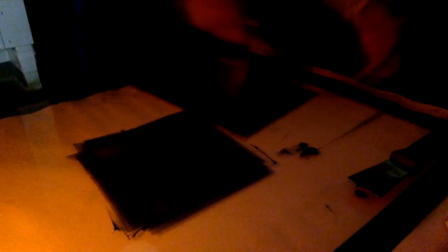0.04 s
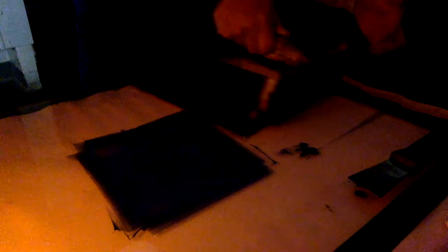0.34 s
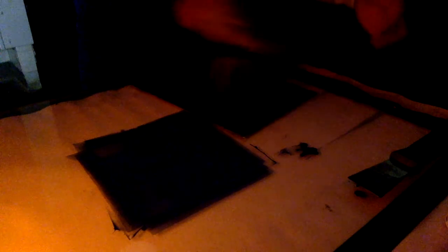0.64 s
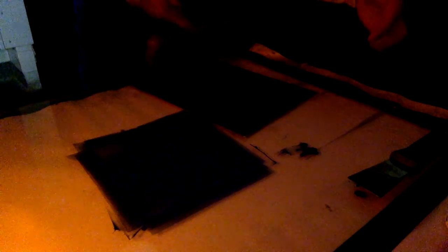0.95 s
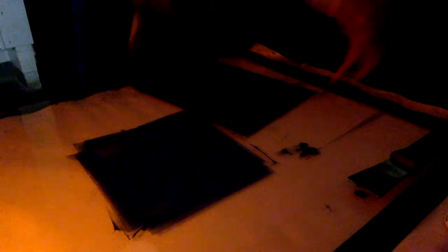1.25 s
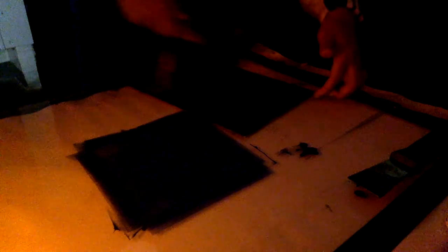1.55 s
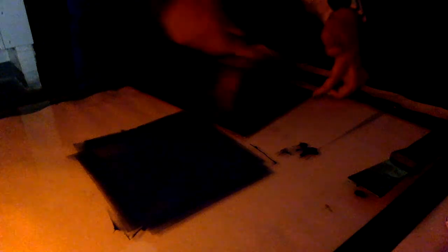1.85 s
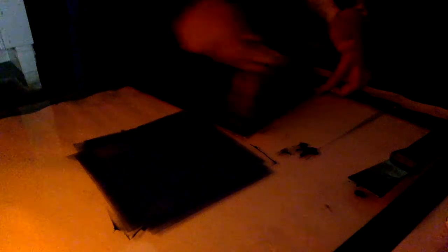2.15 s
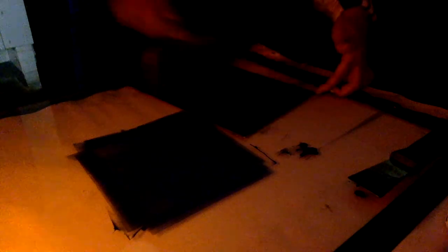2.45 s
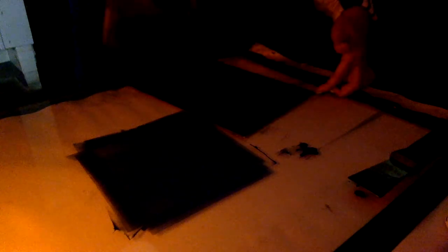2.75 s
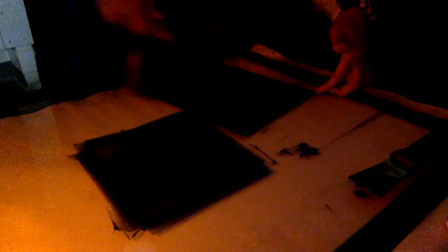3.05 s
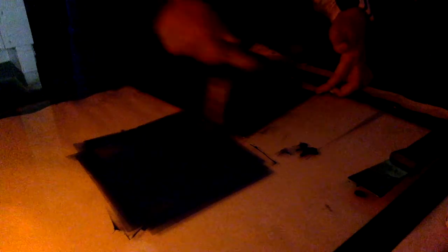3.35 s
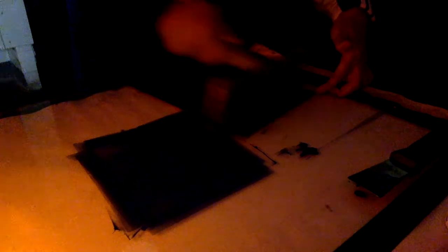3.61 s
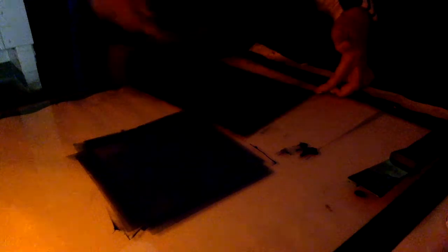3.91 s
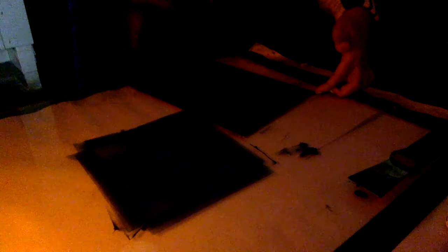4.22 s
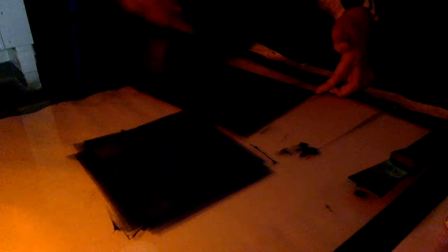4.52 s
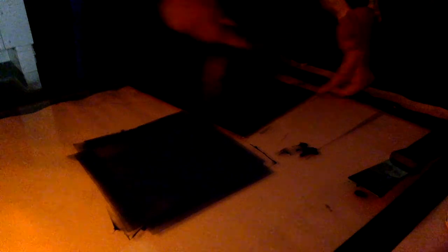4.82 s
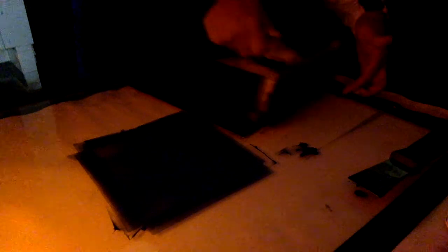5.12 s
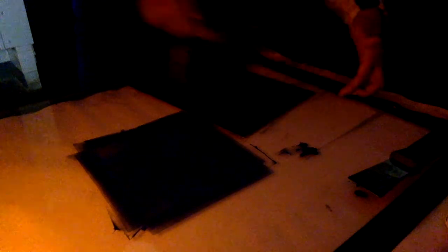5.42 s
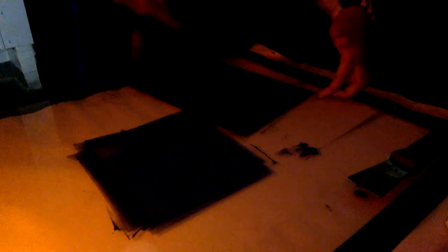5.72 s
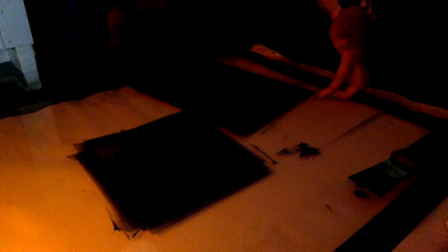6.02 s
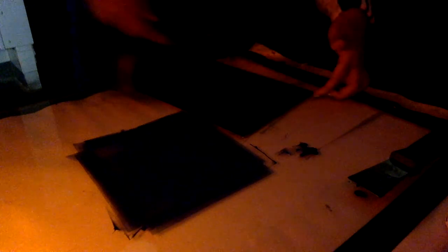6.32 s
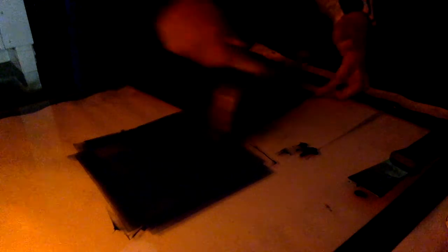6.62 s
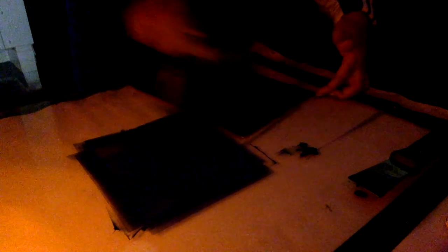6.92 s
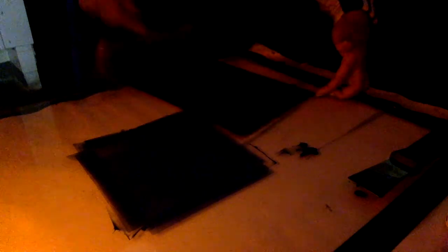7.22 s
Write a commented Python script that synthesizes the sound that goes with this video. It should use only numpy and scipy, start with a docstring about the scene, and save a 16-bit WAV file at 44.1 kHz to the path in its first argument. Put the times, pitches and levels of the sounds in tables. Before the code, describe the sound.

Soft and loud sticky hisses alternate as a squeaky hand roller works a coated metal plate, clacking down between passes.

```python
"""A soft, wet hiss with small squeaks: a hand roller is drawn back over a wet metal plate, then pushed
out with a much louder hiss, five times in all. The hiss is the tacky film splitting behind the roller;
the squeaks and whistles are its dry axle sticking and slipping. Between passes the roller lifts, mostly
with a knock, and lands with a clack of its frame and a thud of the bench. A small room hums underneath."""
import sys
import numpy as np
from scipy import signal
from scipy.fft import rfft, irfft, next_fast_len
from scipy.io import wavfile

SR = 44100
rng = np.random.default_rng(int(sys.argv[2]) if len(sys.argv) > 2 else 0)


def file_out(sig):
    """Save sig as 16-bit WAV at sys.argv[1]."""
    # one column per channel
    cols = np.atleast_2d(sig).T
    # limit, then scale
    lim = np.clip(cols, -1, 1)
    pcm = np.round(lim * 32767).astype(np.int16)
    wavfile.write(sys.argv[1], SR, pcm)


N = 328986
TOP_HZ = 16100  # the top edge of the whole sound


def amp(db):
    """Decibels to gain. Table levels are faders: relative, ahead of the layer and master gains."""
    return 10 ** (np.asarray(db) / 20)


def unit(x):
    """x at rms 1."""
    return x / np.sqrt(np.mean(x ** 2) + 1e-20)


def along(points, hz):
    """Read a curve of (freq_hz, value) points on a log frequency axis."""
    freqs, values = np.transpose(points)
    return np.interp(np.log(hz + 1), np.log(freqs + 1), values)


def wobble(rate, size):
    """A smooth random curve, rate knots a second."""
    knots = rng.standard_normal(max(size, SR) // 8)
    place = np.arange(size) * rate / SR
    k = place.astype(int)
    u = place - k
    return 1.15 * (knots[k] + (knots[k + 1] - knots[k]) * u * u * (3 - 2 * u))


def filtered(x, response):
    """x through a complex frequency response."""
    size = next_fast_len(len(x) + 8192)
    return irfft(rfft(x, size) * response(np.fft.rfftfreq(size, 1 / SR)), size)[:len(x)]


def coloured(x, eq):
    """x shaped by an EQ curve, at rms 1."""
    return unit(filtered(x, lambda hz: amp(along(eq, hz))))


def add(track, start_s, sound):
    """Mix a sound into the track at start_s."""
    part = track[max(round(start_s * SR), 0):][:len(sound)]
    part += sound[:len(part)]


def stroke_gain(rows, power, layer=0, grip_s=.028):
    """The roller's speed follows a half sine, and the hiss follows a power of that speed."""
    gain = np.zeros(N)
    for start, end, slowing, change_db, *levels in rows:
        t = np.arange(max(start, 0), end, 1 / SR)
        u = (t - start) / (end - start)
        ramp = np.clip(np.minimum((t - start) / grip_s, (end - t) / slowing), 0, 1)
        rolling = np.sin(np.pi / 2 * ramp) ** 2
        speed = abs(np.sin(np.pi * u))
        add(gain, start, amp(levels[layer] + change_db * (u - .5)) * rolling * speed ** power)
    return gain


def snaps(eq, per_second, clump_db):
    """Tiny threads of liquid snap at random, in brief clumps."""
    happens = rng.random(N) < per_second / SR
    return coloured(happens * rng.standard_normal(N) * amp(clump_db * wobble(700, N)), eq)


# Firm pushes out: start_s, end_s, slowing_s, change_db, fine_db, coarse_db
PUSHES = [(.405, 1.025, .13, 0.5, -37, -51.5), (2.08, 2.585, 0.063, -0.5, -38, -49),
          (3.495, 3.985, 0.059, 0.5, -37.8, -48.5), (5.128, 5.715, .05, -9.5, -38.5, -51),
          (6.782, 7.29, .06, -0.5, -38, -46)]
# Bright sizzle of the fine snaps: freq_hz, gain_db
FINE_EQ = [(3000, -42.5), (6400, -18), (7800, -5.5), (8800, -5), (10400, -8), (11500, -5), (12800, 1.5),
           (14300, -1.5), (15700, -5.5)]
# Lower rasp of the coarse snaps: freq_hz, gain_db
COARSE_EQ = [(1200, -17), (2900, -24), (3700, -14.5), (4300, -4.5), (5100, 0.5), (5800, 0), (6400, -7),
             (9000, 1), (14000, -20)]


def firm_hiss():
    """The film splits loudly behind the pushed roller; coarser snaps come in at speed."""
    fine = stroke_gain(PUSHES, power=.28) * snaps(FINE_EQ, per_second=17000, clump_db=-.8)
    coarse = stroke_gain(PUSHES, power=.7, layer=1) * snaps(COARSE_EQ, per_second=7600, clump_db=-.3)
    return amp(4) * fine + amp(4.5) * coarse


# Light pulls back: start_s, end_s, slowing_s, change_db, level_db
PULLS = [(-.35, 0.344, .3, 3, -59.5), (1.385, 2.063, 0.3, 0, -51.5), (2.938, 3.495, 0.11, -6.5, -52),
         (4.394, 5.088, 0.2, 8.5, -54.5), (6.162, 6.725, 0.095, 5, -52.5)]
# Thin, airy hiss of the film under light pressure: freq_hz, gain_db
LIGHT_EQ = [(2000, -24), (4000, -21.5), (5500, -5.5), (6500, -19), (8200, -2.5), (10200, -4.5),
            (11300, -5.5), (13000, 0.5), (14500, 0), (15800, -4)]


def light_hiss():
    """The film hisses and crackles softly as the roller is pulled back or peels off."""
    texture = amp(-9.5) * crackle() + snaps(LIGHT_EQ, per_second=12000, clump_db=-1.5)
    return amp(6) * (stroke_gain(PULLS, power=.35) + peel_gain()) * texture


def crackle(count=2400, decay_cycles=11):
    """Stickier spots let go with tiny pings, each with its own pitch and size."""
    when, pitch, size = rng.random((count, 3)).T[:, :, None]
    k = np.arange(SR // 100)
    hz = 6000 * 2.5 ** pitch
    age = k / SR * hz / decay_cycles
    size_db = -np.log(1 - .98 * size)
    grains = amp(size_db) * hz * age * np.exp(-age) * np.sin(2 * np.pi * hz * k / SR)
    places = (when * N).astype(int) + k
    return unit(np.bincount(places.ravel(), grains.ravel(), N)[:N])


# Short rips at the ends of strokes: start_s, length_s, level_db
RIPS = [(0.369, 0.04, -63), (.995, .045, -50), (3.97, 0.036, -46.5), (6.74, 0.04, -48.5)]


def peel_gain():
    """The hiss swells briefly where the stopped roller comes unstuck from the film."""
    gain = np.zeros(N)
    for start, length, db in RIPS:
        add(gain, start, amp(db) * np.hanning(int(length * SR)))
    return gain


# Axle squeaks: start_s, length_s, pitch_hz, glide_ratio, level_db, roughness (0-1)
AXLE_SQUEAKS = [ (0.028, .079, 1570, -0.023, -59, 0.3), (.1, .014, 11300, 0.12, -32.5, 0.04),
                (.262, 0.021, 5700, -.02, -46, 0.16), (0.624, 0.034, 1180, -0.017, -47.5, .3),
                (.829, .028, 3260, -.04, -53.5, .3), (.858, 0.019, 8160, -0.023, -17.5, 0.14),
                (0.992, 0.037, 6670, -0.062, -44, 0.8), (1.438, .024, 8714, 0.051, -15.5, 0.09),
                (1.454, .048, 8900, .04, -27.5, 0.3), (1.507, 0.019, 11100, -0.0026, -36.5, 0.44),
                (1.652, 0.057, 1660, -0.022, -41, 0.45), (1.744, 0.053, 5550, 0.011, -24, .7),
                (1.776, 0.057, 3060, .06, -51.5, .2), (1.834, 0.059, 1580, -0.049, -45, .53),
                (2.391, 0.037, 1072, -0.034, -44, 0.34), (2.469, 0.019, 4440, -0.059, -36.5, .3),
                (2.602, 0.023, 6140, .1, -46.5, 0.74), (2.993, 0.038, 4470, 0.073, -38.5, 0.48),
                (3.062, 0.022, 10050, 0.02, -30.5, .3), (3.12, 0.042, 5550, -0.015, -24.5, .45),
                (3.148, .027, 5555, .03, -17.5, 0.2), (3.222, 0.027, 5790, 0.00082, -25, 0.32),
                (3.257, 0.027, 8196, -0.018, -19, .02), (3.829, 0.024, 4390, -0.0087, -31.5, 0.28),
                (4.499, .04, 15250, 0, -35, .05), (4.547, .054, 15550, -.01, -37, 0.1),
                (4.606, 0.058, 15560, -.01, -31, 0.04), (4.821, 0.17, 1599, -0.0366, -40, 0.18),
                (5.023, 0.023, 10030, 0.016, -30.5, .02), (5.034, .018, 6210, .07, -36, 0.16),
                (5.19, 0.024, 9240, -0.015, -30.5, 0.1), (5.254, 0.035, 1077, 0.066, -42.5, .28),
                (5.288, 0.045, 3200, 0, -55, .2), (5.561, .019, 8160, 0.029, -25.5, 0.16),
                (5.727, 0.025, 6080, 0.093, -42.5, .7), (6.324, 0.023, 4243, -0.021, -33.5, 0.18),
                (6.36, .032, 14650, 0, -37, .1), (6.459, 0.02, 1637, 0.0075, -44.5, 0.24),
                (6.609, 0.042, 3153, -0.0071, -55, 0.34), (6.656, 0.017, 5680, .05, -42.5, 0.54),
                (6.662, .017, 7000, 0, -45, .3), (6.956, 0.054, 1950, .04, -58, 0.95),
                (7.027, 0.02, 4480, 0.039, -32.5, 0.12), (7.127, 0.035, 4376, -0.016, -32.5, 0.24),
                (7.151, 0.021, 8870, 0.0014, -17, .25), (7.168, 0.018, 8050, -.02, -23.5, 0.3),
                (7.195, 0.05, 400, .07, -47.5, 0.8)]
# One-note whistles under firm pressure: start_s, length_s, level_db, sag_ratio
AXLE_WHISTLES = [(0.706, 0.041, -39, 0.036), (0.77, 0.068, -37, 0.059), (3.552, 0.072, -34, 0.045),
                 (3.699, 0.069, -29.5, 0.056), (5.145, .056, -37.5, .035), (5.196, .07, -34, 0.056),
                 (5.269, 0.14, -36, 0.0053), (5.372, 0.073, -36.5, 0.055)]


def axle(whistle_hz=6378):
    """The dry axle's squeaks glide up or down; its whistle sags under load and recovers."""
    out = np.zeros(N)
    for start, length, hz, glide, db, rough in AXLE_SQUEAKS:
        bend = glide * np.linspace(-.5, .5, int(length * SR))
        add(out, start, squeal(hz * (1 + bend), db, rough))
    for start, length, db, sag in AXLE_WHISTLES:
        load = np.sin(np.linspace(0, np.pi, int(length * SR)))
        add(out, start, squeal(whistle_hz * (1 - sag * load), db, rough=.219))
    return out


def chirps(per_stroke=3, low_hz=6560, high_hz=14900, length_s=.02, glide=.15):
    """Faint high squeaks at random moments around the middle of each light pull."""
    out, u = np.zeros(N), np.linspace(-.5, .5, int(length_s * SR))
    for start, end, *_, hiss_db in PULLS:
        for when, pitch, bend in rng.random((per_stroke, 3)):
            onset = start + (end - start) * (1 + 3 * when) / 6
            hz = low_hz * (high_hz / low_hz) ** pitch * (1 + glide * (bend - .5) * u)
            add(out, onset, (onset > 0) * squeal(hz, hiss_db + 6, rough=.27))
    return out


# A squeak's octave, strong where it meets a resonance of the frame: pitch_hz, octave_db
OCTAVE_LEVELS = [(400, -23), (1080, -12.5), (1600, -23.5), (3200, -17), (4230, -4.5), (4420, 3),
                 (5500, -19.5), (6200, -5.5), (7200, -28.5)]
# How well the frame passes the weaker partials: freq_hz, gain_db
PARTIAL_EQ = [(3000, -20), (4400, -20), (4800, 3), (6400, -10), (8200, 1), (10000, -15), (14000, -7.5)]


def squeal(hz, db, rough, jitter=.039, flutter_db=4, attack_s=.007, release_s=.01):
    """A stick-slip tone on the pitch curve hz; rough ones waver in pitch and level, and rasp."""
    size, middle_hz = len(hz), hz.mean()
    u, length = np.linspace(0, 1, size), size / SR
    waver, flutter, rasp = wobble(350, size), wobble(220, size), wobble(2200, size)
    phase = 2 * np.pi * np.cumsum(hz * (1 + jitter * rough * waver)) / SR

    def partials(orders):
        return sum(amp(along(PARTIAL_EQ, k * middle_hz)) * np.sin(k * phase)
                   for k in orders if k * middle_hz < TOP_HZ)

    octave = (2 * middle_hz < TOP_HZ) * amp(along(OCTAVE_LEVELS, middle_hz)) * np.sin(2 * phase)
    # rough slips are sharper (upper partials) and alternate strong and weak (partials halfway)
    edge = amp(-7) * partials([3, 4, 5]) + amp(-8) * partials([.5, 1.5, 2.5])
    tone = np.sin(phase) + octave + rough * edge
    ramp = np.clip(np.minimum(u / attack_s, (1 - u) / release_s) * length, 0, 1)
    swell = np.sin(np.pi / 2 * ramp) ** 2
    strength = amp(db - 9.6 * (2 * u - 1) ** 2 + flutter_db * rough * flutter)
    grain = 1 + amp(-25) * np.sqrt(rough) * 2 * rasp
    return np.sqrt(2) * tone * swell * strength * grain


# The roller lands, one end first:
# start_s, first_clack_db, gap_s, second_clack_db, second_contact_s, knock_db, thud_db, thud_pitch_ratio
SET_DOWNS = [(1.368, -17, 0.03, -17.5, 0.0015, -35.5, -32.5, 1),
             (2.908, -12, .0063, -4, .0006, -28, -19.5, 1),
             (4.383, -16, 0.011, -26.5, .0025, -39.5, -34, 0.69),
             (6.155, -2.5, .0143, -11, .0014, -33, -24.5, 0.87)]


def landings(thud_lag_s=.003, rebound_s=.016, rebound_db=-8):
    """Each end clacks the frame and knocks the plate; the bench takes the weight and rebounds once."""
    clacks, blows = np.zeros((2, N))
    for start, first_db, gap, second_db, contact_s, knock_db, thud_db, pitch in SET_DOWNS:
        add(clacks, start, clack(first_db, contact_s=.0015, tilt_db=-2.5))
        add(blows, start, knock(knock_db - 3))
        add(clacks, start + gap, clack(second_db, contact_s, tilt_db=2.5))
        add(clacks, start + gap, chatter(first_db - 37))
        settled = start + gap + thud_lag_s
        add(blows, settled, knock(knock_db) + thud(thud_db, pitch))
        add(blows, settled + rebound_s, knock(knock_db + rebound_db) + thud(thud_db + rebound_db, pitch))
    return clacks, blows


# The roller comes off the plate: start_s, clack_db, knock_db, thud_db
LIFT_OFFS = [(1.033, -25.5, -34, -57.5), (4.003, -33, -35.5, -52), (5.776, -28.5, -30, -38.5)]


def lifts():
    """The frame clacks once as the roller lifts, and the plate drops back on the bench."""
    clacks, blows = np.zeros((2, N))
    for start, clack_db, knock_db, thud_db in LIFT_OFFS:
        add(clacks, start, clack(clack_db, contact_s=.0026, tilt_db=-2))
        add(blows, start, knock(knock_db) + thud(thud_db, pitch=1.24))
    return clacks, blows


# Metallic ring of the frame: freq_hz, width_hz, gain_db
FRAME_MODES = [(2300, 430, -20.5), (4300, 840, -9.5), (5330, 470, -0.5), (7800, 780, -8), (9250, 320, 0),
               (10140, 110, 0), (12760, 4200, -13)]


def clack(db, contact_s, tilt_db):
    """A brief gritty contact rings the metal frame; tilt_db per octave brightens or dulls it."""
    def metal(hz):
        modes = sum((-1) ** k * amp(gain) * 1j * hz * width / (centre ** 2 - hz ** 2 + 1j * hz * width)
                    for k, (centre, width, gain) in enumerate(FRAME_MODES))
        return modes * amp(tilt_db * np.log2(np.maximum(hz, 2000) / 7000))

    t = np.arange(SR // 5) / SR
    hit = t / contact_s * np.exp(-t / contact_s)
    tail = amp(-25 - 60 * t / .056)
    ring = filtered(rng.standard_normal(len(t)) * (hit + tail), metal)
    return amp(db) * ring / np.abs(ring).max()


# Low body of the bench: freq_hz, gain_db
BENCH_EQ = [(25, -54.5), (50, -28.5), (75, -9.5), (120, 2.5), (180, -0.5), (250, -10), (340, 0.5),
            (480, -15), (700, -16.5), (1000, -24), (2000, -45.5)]


def thud(db, pitch, attack_s=.0036, t60_s=.09):
    """The bench shakes; the pitch depends on where the blow lands."""
    t = np.arange(SR // 4) / SR
    shake = rng.standard_normal(len(t)) * amp(-60 * t / t60_s) * (1 - np.exp(-t / attack_s))
    return amp(db - 17) * unit(filtered(shake, lambda hz: amp(along(BENCH_EQ, hz / pitch))))


# Midrange clatter of the plate: freq_hz, gain_db
PLATE_EQ = [(150, -17), (400, -0.5), (620, -2), (950, -7), (1300, -1), (1700, 1), (2200, -6), (2800, -13),
            (4000, -5), (8000, -18.5)]


def knock(db, t60_s=.11):
    """The plate rattles briefly on the bench."""
    t = np.arange(SR // 4) / SR
    return amp(db - 15.5) * unit(coloured(rng.standard_normal(len(t)), PLATE_EQ) * amp(-60 * t / t60_s))


# Stray ticks of the frame: start_s, level_db
FRAME_TICKS = [(3.01, -24.5), (3.896, -27), (3.913, -25), (4.527, -36), (5.657, -34.5), (5.736, -30.5),
               (6.611, -34), (7.257, -34)]


def rattles():
    """The loose frame ticks as the roller runs."""
    out = np.zeros(N)
    for start, db in FRAME_TICKS:
        add(out, start, clack(db, contact_s=.0015, tilt_db=1.5))
    return out


# Tinny colour of the roller shaking on its axle: freq_hz, gain_db
CHATTER_EQ = [(1200, -29.5), (2300, -6), (3200, -20), (4400, -16), (5400, 0), (6300, -15), (9000, -13.5),
              (15000, -25)]


def chatter(db, t60_s=.45):
    """After a landing the roller chatters on its axle, ever more faintly."""
    t = np.arange(SR // 2) / SR
    return amp(db - 60 * t / t60_s) * coloured(rng.standard_normal(len(t)), CHATTER_EQ)


def walls(x, per_second=900, t60_s=.19, predelay_s=.003):
    """Bench top and near walls send back a quick scatter of copies."""
    t = np.arange(SR // 16) / SR
    arrives = (rng.random(len(t)) < per_second / SR) * (t > predelay_s)
    copies = arrives * rng.standard_normal(len(t)) * amp(-60 * t / t60_s)
    return signal.fftconvolve(x, copies / np.linalg.norm(copies))[:N]


# Short reverb of the small room: freq_hz, t60_s
ROOM_DECAY = [(100, 0.24), (500, 0.32), (1600, .44), (4200, .42), (5600, 0.49), (9000, 0.28), (15000, 0.23)]


def room(x, predelay_samples=300):
    """The room's diffuse tail; each frequency dies at its own speed."""
    hz, t, noise = signal.stft(rng.standard_normal(SR), SR, nperseg=256)
    decay = amp(-60 * t / along(ROOM_DECAY, hz)[:, None])
    tail = np.pad(signal.istft(noise * decay, SR, nperseg=256)[1], (predelay_samples, 0))
    return signal.fftconvolve(x, tail / np.linalg.norm(tail))[:N]


# Dark bed of moving air: freq_hz, gain_db
AIR_EQ = [(25, -32), (55, -22.5), (85, -9.5), (140, 1.5), (200, 3.5), (260, 1.5), (550, -2.5),
          (1200, -10.5), (1900, -14), (2550, -14), (3100, -21), (4500, -25), (7000, -36), (15500, -53)]
# Room tone, mains first and then the fan: pitch_hz, level_db
HUM_TONES = [(99.8, -52.5), (176, -70.5), (198, -66), (221.5, -64), (442, -74), (499, -70.5), (884, -67),
             (1105, -77.5)]


def hum():
    """Steady mains hum and the slightly unsteady tones of a fan, over moving air."""
    t = np.arange(N) / SR
    out = amp(-60) * coloured(rng.standard_normal(N), AIR_EQ)
    for k, (hz, db) in enumerate(HUM_TONES):
        drift = .5 if k else .03
        level = np.sqrt(2) * amp(db + 2.4 * drift * wobble(4.2, N))
        out += level * np.sin(2 * np.pi * hz * t + drift * wobble(8.5, N))
    return out


def scene():
    """Film, axle, frame and bench, with their reflections and the room's hum, in mono."""
    hiss = firm_hiss() + light_hiss()
    squeaks = axle() + chirps()
    landing_clacks, landing_blows = landings()
    lift_clacks, lift_blows = lifts()
    clacks = landing_clacks + lift_clacks + rattles()
    blows = landing_blows + lift_blows
    early = walls(amp(-10) * squeaks + amp(-16) * clacks)
    reverb = room(amp(-26) * hiss + amp(-9) * squeaks + amp(-14.5) * clacks + amp(-11.5) * blows)
    mono = hiss + squeaks + clacks + blows + early + reverb + hum()
    return np.array([mono, mono])


# Master fader, held until it drops at the very end: time_s, gain_db
MASTER_FADER = [(7.335, 2.5), (7.355, -9.5), (7.46, -6)]


def record(dry, ceiling=.85, low_cut_hz=55):
    """The microphone rounds sharp peaks and loses deep bass and extreme treble; the end drops in level."""
    fader = amp(np.interp(np.arange(N) / SR, *np.transpose(MASTER_FADER)))
    rounded = dry / (1 + np.abs(dry / ceiling) ** 8) ** (1 / 8)
    thin = signal.sosfilt(signal.butter(2, low_cut_hz, "high", fs=SR, output="sos"), rounded)
    high_cut = lambda hz: 1 / (1 + (hz / TOP_HZ) ** 160)
    return np.array([filtered(channel * fader, high_cut) for channel in thin])


dry = scene()
out = record(dry)
file_out(out)
```